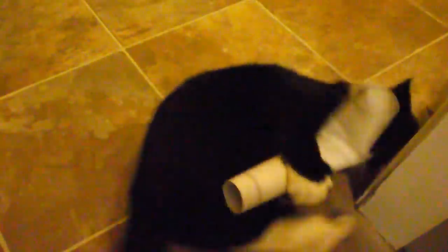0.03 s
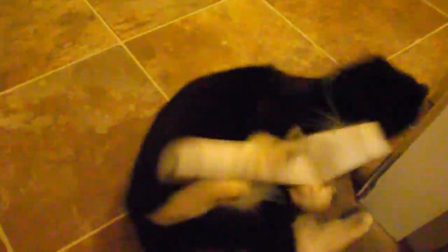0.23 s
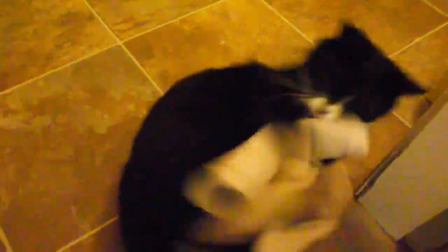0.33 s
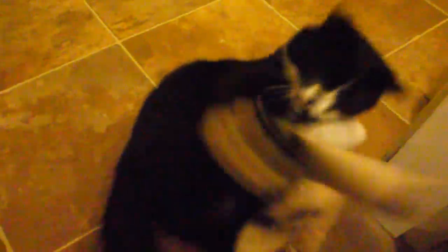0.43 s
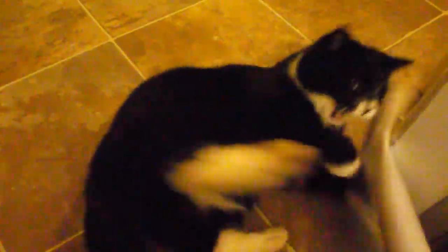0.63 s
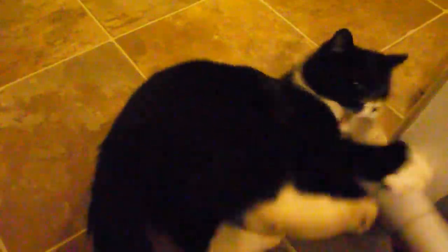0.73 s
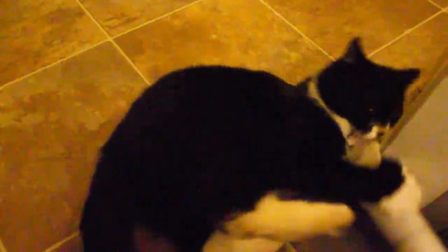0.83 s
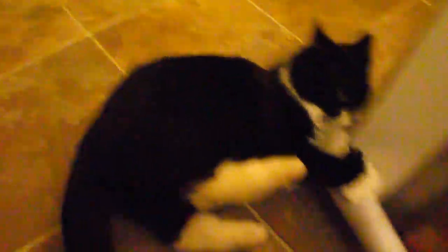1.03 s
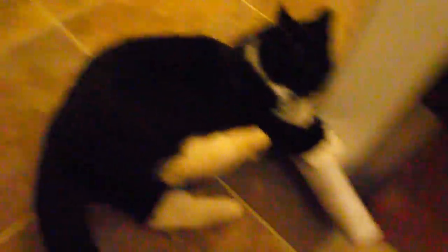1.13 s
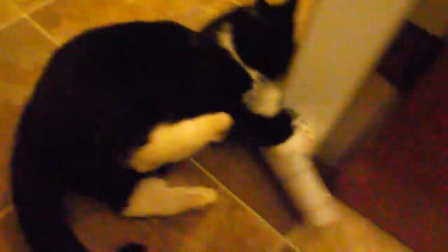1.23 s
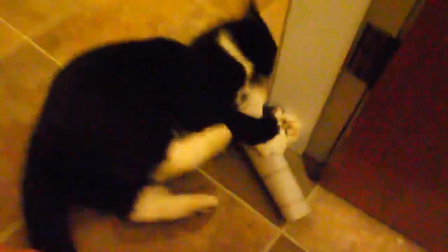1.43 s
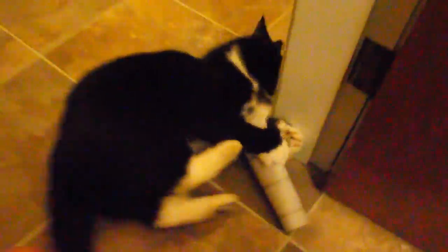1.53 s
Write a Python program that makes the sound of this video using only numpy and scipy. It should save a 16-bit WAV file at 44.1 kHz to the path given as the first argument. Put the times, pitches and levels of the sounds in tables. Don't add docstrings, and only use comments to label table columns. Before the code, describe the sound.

A cat wrestles a hollow cardboard tube on a tiled floor with sharp crunches and knocks

```python
import sys
import numpy as np
from scipy import signal
from scipy.fft import rfft, irfft
from scipy.io import wavfile

SR = 44100
rng = np.random.default_rng(int(sys.argv[2]) if len(sys.argv) > 2 else 0)


def put_to_file(sound):
    columns = np.atleast_2d(sound).T
    safe = np.clip(columns, -1, 1)
    whole_steps = np.round(safe * 32767)
    wavfile.write(sys.argv[1], SR, whole_steps.astype(np.int16))


def volts(x):
    e = np.asarray(x, float) / 20
    return 10 ** e


N = 70560

# f/Hz, level/dB, t60/s
TUBE = [(682, -16.5, 0.12), (801.2, 3, 0.037), (847.6, -0.5, 0.061), (966.7, -5.5, 0.067),
        (1196, -10.5, 0.058), (1418, -6.5, 0.035), (1543, -8, 0.045), (1763, -9.5, 0.052)]
# f/Hz, level/dB per Hz
CARD = [(180, -43), (300, -4.5), (433, -13.5), (900, 8), (1060, 1), (1390, -0.5), (6000, -2), (10000, -18),
        (16000, -45)]


def rms_one(x):
    return x / np.sqrt(np.mean(x ** 2) + 1e-20)


def colour(x, points):
    hz = np.maximum(np.arange(2049) * SR / 4096, 1)
    p = np.array(points, float)
    level_db = np.interp(np.log(hz), np.log(p[:, 0]), p[:, 1], left=p[0, 1] - 20)
    cepstrum = irfft(np.log(volts(level_db)))
    cepstrum[1:2048] *= 2
    cepstrum[2049:] = 0
    h = irfft(np.exp(rfft(cepstrum)))
    return signal.fftconvolve(x, h / np.sqrt(np.sum(h ** 2)))[:len(x)]


def drift(rate_hz):
    r = np.exp(-2 * np.pi * rate_hz / SR)
    wander = signal.lfilter([1], [1, -2 * r, r * r], rng.standard_normal(N + SR))
    return rms_one(wander[SR:])


def ring(drive, hz, t60):
    r, w = volts(-60 / (t60 * SR)), 2 * np.pi * hz / SR
    return signal.lfilter([0, np.sin(w)], [1, -2 * r * np.cos(w), r * r], drive + 1e-18)


def strike(times, levels_db, modes, spread_db, ratios=1):
    contact_s, thud_cut_hz = 0.0012, 129
    hz, db, t60 = np.transpose(modes)[:, :, None]
    t, out = np.arange(SR // 2) / SR, np.zeros(N + SR)
    luck = rng.standard_normal((len(times), len(modes), 1))
    signs = np.where(hz > 900, -1., 1.)
    contact = 1 - np.exp(-t / contact_s)
    for s, level_db, ratio, chance in zip(times, levels_db, ratios * np.ones(len(times)), luck):
        i = int(s * SR)
        heights = signs * volts(level_db + db + spread_db * chance - 60 * t / t60)
        rings = heights * np.sin(2 * np.pi * ratio * hz * t)
        out[i:i + len(t)] += np.sum(rings, axis=0) * contact
    return signal.sosfilt(signal.butter(4, thud_cut_hz, "high", fs=SR, output="sos"), out[:N])


def hollow(rub):
    pulse = np.zeros(SR // 4)
    pulse[0] = 1
    h = sum(volts(db) * ring(pulse, hz, t60) for hz, db, t60 in TUBE)
    return signal.fftconvolve(rub, h / np.sqrt(np.sum(h ** 2)))[:N]


def fibres():
    snaps_per_s, spread_db = 6700, 1
    sizes = volts(spread_db * np.minimum(rng.exponential(1, N), 5)) * rng.choice([-1, 1], N)
    return rms_one(sizes * (rng.random(N) < snaps_per_s / SR))


def background():
    # f/Hz, level/dB per Hz
    room_tone = [(41, -29), (60, -7), (166, -24.5), (394, -6), (554, -15), (1650, -15), (2220, -22),
                 (5370, -21.5), (16000, -55)]
    room_db, wobble_db, preamp_db = -45, 1.5, -66
    whine_hz, whine_db = 10650, -73
    handling_hz, handling_db = 21.3, -37
    hiss = volts(room_db + wobble_db * drift(22)) * colour(rng.standard_normal(N), room_tone)
    hiss = hiss + volts(preamp_db) * rng.standard_normal(N)
    whine = volts(whine_db) * rms_one(ring(rng.standard_normal(N), whine_hz, 0.044))
    band = signal.butter(1, [4, 70], "band", fs=SR, output="sos")
    hand = volts(handling_db) * rms_one(signal.sosfilt(band, drift(handling_hz)))
    return hiss + whine + hand + .0009


def room(x):
    t60_s, wall_cut_hz = 0.52, 6400
    paths_s = np.geomspace(.0131, .0373, 10)
    out, dull = np.zeros(N), np.exp(-2 * np.pi * wall_cut_hz / SR)
    for k, lag in enumerate((paths_s * SR).astype(int)):
        loop, gain, state = x.copy(), volts(-60 * lag / SR / t60_s), [0.]
        for i in range(lag, N, lag):
            back, state = signal.lfilter([gain * (1 - dull)], [1, -dull], loop[i - lag:i], zi=state)
            loop[i:i + lag] += back[:N - i]
        out += (loop - x) * (-1) ** k
    for lag in (71, 167, 241):
        a = np.zeros(lag + 1)
        a[0], a[-1] = 1, .6
        out = signal.lfilter(a[::-1], a, out)
    return out


def door():
    # t/s, low knock/dB, high knock/dB, boom/dB
    bumps = [(0.085, -30.5, -57, -31.5), (.22, -40, -60, -27.5), (0.319, -36, -64, -61),
             (0.471, -43, -37, -28), (0.527, -33, -27, -31), (.7135, -15, -13.5, -12.5),
             (0.762, -36, -11.5, -15), (.79, -43, -25.5, -46), (0.844, -37.5, -28, -22),
             (.892, -50, -35, -60), (.975, -44.5, -39.5, -40), (1.08, -40.5, -50, -59),
             (1.249, -38, -35, -62)]
    # f/Hz, level/dB, t60/s
    low_modes = [(203.3, 1, 0.27), (282, -17, 0.14)]
    # f/Hz, level/dB, t60/s
    high_modes = [(400, -6, .12), (430, 0, .18), (466, -9, .08)]
    boom_hz, swell_s, boom_t60_s = 81.5, .035, 0.29
    s, low_db, high_db, boom_db = np.transpose(bumps)
    t = np.arange(N) / SR
    since = np.maximum(t - s[:, None], 0)
    swell = volts(boom_db[:, None] - 60 * since / boom_t60_s) * (1 - np.exp(-since / swell_s))
    boom = np.sum(swell, axis=0) * np.sin(2 * np.pi * boom_hz * t)
    high = strike(s, high_db, high_modes, spread_db=2.0)
    return boom + strike(s, low_db, low_modes, spread_db=2.5) + high


def drag():
    # t/s, level/dB, tube ring re drag/dB
    strokes = [(0, -24.5, -1.5), (.05, -27.5, 4.5), (.095, -30.5, -2.5), (0.144, -20.5, -6.5),
               (0.186, -30, -6.5), (.25, -22, -8), (.29, -21.5, -4.5), (.375, -35.5, -25),
               (0.429, -45.5, -2), (0.502, -16.5, 6), (.6, -29, 3), (0.679, -33, 14.5), (0.782, -23.5, -2),
               (0.918, -41.5, -21), (1.05, -54, 7), (1.25, -36, 4.5), (1.4, -37, -6.5), (1.6, -65, 15)]
    # t/s, level/dB
    fur = [
        (0, -48),
        (.1, -43),
        (.15, -29),
        (.19, -33.5),
        (.225, -21),
        (.26, -32),
        (.33, -33),
        (.4, -55),
        (.6, -80),
    ]
    s, level_db, tube_db = np.transpose(strokes)
    t = np.arange(N) / SR
    grip = volts(np.interp(t, s, level_db) - 0.5 + 2.6 * drift(23.7))
    rub = grip * (0.34 * fibres() + 0.46 * rng.standard_normal(N))
    airy = signal.butter(2, [5500, 9700], "band", fs=SR, output="sos")
    brush = volts(np.interp(t, *np.transpose(fur))) * signal.sosfilt(airy, fibres())
    return brush + colour(rub, CARD) + hollow(volts(np.interp(t, s, tube_db)) * rub)


def crunches():
    # t/s, level/dB, length/s, brightest f/Hz, tube ring re level/dB
    bursts = [(0.053, -26.5, 0.014, 2700, -5), (0.191, -27, 0.012, 4800, -12),
              (0.201, -25.5, 0.0039, 2780, -23), (0.2115, -26, 0.0077, 6400, -18),
              (0.219, -17.5, 0.0051, 3370, -5), (0.2243, -17, 0.0086, 3280, -14.5),
              (0.2253, -18, 0.0067, 6250, -17.5), (.245, -23, 0.0049, 5600, -10),
              (0.325, -26, 0.0096, 7400, -8.5), (0.348, -30, 0.019, 5500, -28),
              (0.4403, -18.5, 0.0087, 3630, 1), (0.452, -16.5, 0.0029, 3400, -11),
              (0.4543, -14, 0.0021, 7500, -3), (0.473, -18, 0.0038, 5060, -5.5),
              (0.4821, -11, 0.0022, 3960, -0.5), (0.487, -20.5, 0.012, 4860, -9),
              (0.5135, -9.5, 0.0015, 4440, -14), (0.525, -18, 0.0046, 4240, -19),
              (0.553, -26, 0.016, 3470, -33), (0.62, -18.5, 0.0028, 3000, -13),
              (0.648, -22.5, 0.009, 2500, -3.5), (0.656, -21, 0.0069, 3460, -9),
              (0.662, -23, 0.0027, 5470, -3), (0.6907, -26, .0012, 4100, -8),
              (0.694, -26, 0.006, 2950, -19), (0.7, -19.5, 0.0033, 5000, -13),
              (0.7124, -12.5, 0.0013, 5500, -29), (0.715, -18, 0.0035, 2840, -24),
              (0.759, -17, 0.0028, 3500, -10), (0.973, -42.5, 0.026, 3800, -6.5),
              (1.171, -28, 0.00097, 3266, -30), (1.178, -35, .012, 3800, -25),
              (1.1889, -18.5, 0.0031, 6700, -6), (1.193, -23, 0.0086, 3240, -12),
              (1.21, -27, 0.021, 3900, -3), (1.24, -38.5, 0.012, 5100, -16),
              (1.324, -48.5, 0.025, 2950, -1), (1.43, -34, 0.01, 1350, -18),
              (1.488, -37.5, 0.051, 5450, -1.5), (1.4533, -27, 0.0023, 1140, -8.5),
              (1.552, -43, 0.0048, 1500, -8)]
    rise_s, fall_db_per_s = 0.00047, 1800
    lift_db, width_oct = 11, .55
    t, out, shake, grit = np.arange(N) / SR, np.zeros(N), np.zeros(N), fibres()
    grid_hz, card = np.geomspace(200, 16000, 32), np.array(CARD)
    card_db = np.interp(np.log(grid_hz), np.log(card[:, 0]), card[:, 1])
    for s, db, length, hz, tube_db in bursts:
        fall_db = np.clip(t - s - length, 0, 1) * fall_db_per_s
        shape = np.clip((t - s) / rise_s, 0, 1) * volts(db - fall_db)
        i, j = int(s * SR), min(N, int((s + length + 0.068) * SR))
        burst = (shape * grit)[i:j]
        tint_db = card_db + lift_db * np.exp(-(np.log2(grid_hz / hz) / width_oct) ** 2)
        out[i:j] += colour(burst, np.transpose([grid_hz, tint_db]))
        shake[i:j] += volts(tube_db) * burst
    return out + hollow(shake)


def blows():
    # t/s, crack peak/dB, tube ring/dB, soft body thud/dB, pitch ratio of the bent tube
    hits = [(0.221, -9.5, -23.5, -53, 0.93), (0.4375, 7, -11.5, -21.5, 0.94), (.456, -29, -17, -16, 0.88),
            (0.4711, 2, -8, -12, 1.004), (0.4778, -1.5, -14.5, -27, 0.82), (0.482, -1, -24, -17, 0.97),
            (.489, -23, -20.5, -30, 1.2), (0.497, -5, -22, -22, 1.01), (.506, -19, -12.5, -25, 1.05),
            (0.5145, -1, -26, -16.5, 1.1), (0.5245, -2.5, -18.5, -13, 1.1), (.54, -36, -26, -28, .95),
            (.56, -9, -31, -38, 0.97), (0.609, -23, -22, -31, 1.2), (0.6213, -12, -15.5, -24, 1.08),
            (0.645, 4, -16.5, -14, 1.13), (.656, -3.5, -19.5, -28, 1.0), (0.6908, 4.5, -22, -36, 1.0),
            (.697, -9, -12, -12.5, 1.02), (0.7131, -1, -17.5, -18, 1.0), (0.7602, -12.5, -20, -13.5, 1.22),
            (1.083, -54, -44, -38, 1.12), (1.1123, -36.5, -49, -27, 0.7), (1.171, -45, -40, -20.5, 1.5),
            (1.1904, -12.5, -25.5, -37, 1.28), (1.2022, -35, -23, -35, 1.13), (1.211, -37, -17.5, -22, 1.2),
            (1.2333, -43, -21, -15, 1.08), (1.4285, -37, -32, -22, 0.77), (1.4535, -37, -28, -21.5, 1.01)]
    # f/Hz, level/dB per Hz
    crack_colour = [(500, -23), (1200, 7.5), (3000, 3.5), (6000, 2.5), (9000, -13.5), (12000, -28),
                    (16500, -43)]
    # f/Hz, level/dB, t60/s
    body_modes = [(224, -23.5, 0.11), (277, -5.5, 0.047), (337.4, -7, 0.077), (399, -6, 0.046),
                  (491, -11, 0.023)]
    needle_db, crack_t60_s, thud_delay_s = 6, 0.0028, 0.0019
    s, crack_db, tube_db, thud_db, ratio = np.transpose(hits)
    t = np.arange(600) / SR
    spray, cracks = rng.standard_normal((len(s), len(t))), np.zeros(N + len(t))
    spray[:, 0] = volts(needle_db)
    for k, i in enumerate((s * SR).astype(int)):
        cracks[i:i + len(t)] += volts(crack_db[k] - 60 * t / crack_t60_s) * spray[k]
    crack = colour(cracks[:N], crack_colour)
    tube = strike(s, tube_db, TUBE, spread_db=3.5, ratios=ratio)
    thud = strike(s + thud_delay_s, thud_db, body_modes, spread_db=4.0)
    return crack + tube + thud


def scene():
    play, knocks = blows() + crunches() + drag(), door()
    echo = volts(-20.5) * room(play + volts(-8) * knocks)
    return (play + knocks + echo + background())[None]


def low_pass(x):
    return signal.sosfilt(signal.butter(12, 16550, fs=SR, output="sos"), x)


def record(dry):
    clip_top, cutoff_hz = 1.0, 16500
    x = dry / (1 + np.abs(dry / clip_top) ** 8) ** (1 / 8)
    x = signal.sosfilt(signal.cheby2(10, 25, cutoff_hz, fs=SR, output="sos"), x)
    return low_pass(np.clip(x, -1, 1))


dry = scene()
out = record(dry)
put_to_file(out)
```